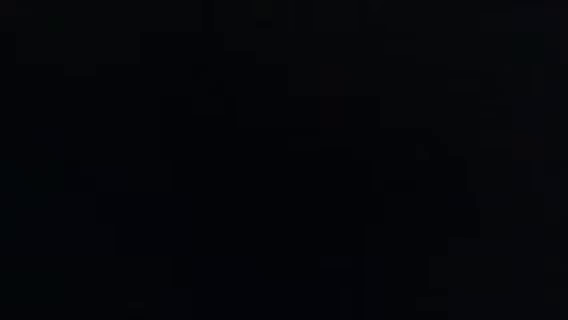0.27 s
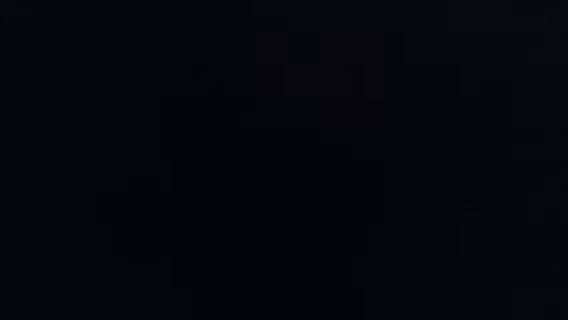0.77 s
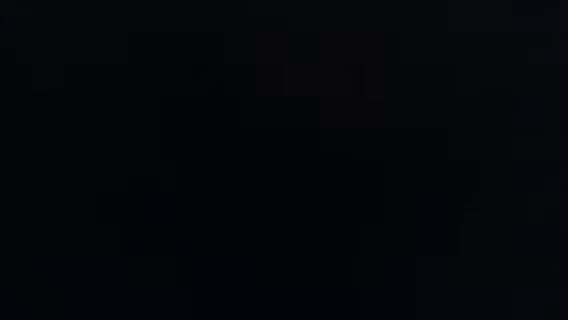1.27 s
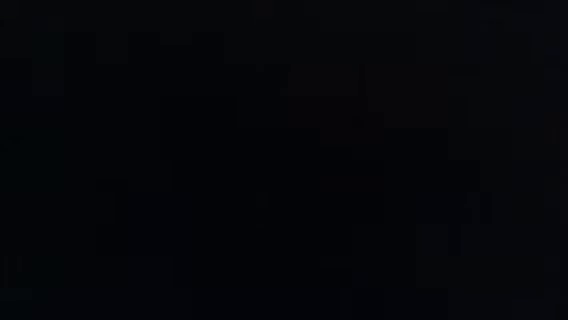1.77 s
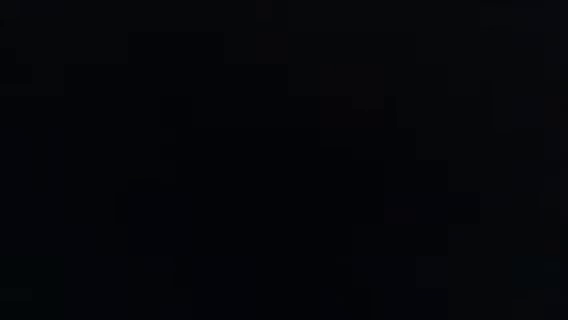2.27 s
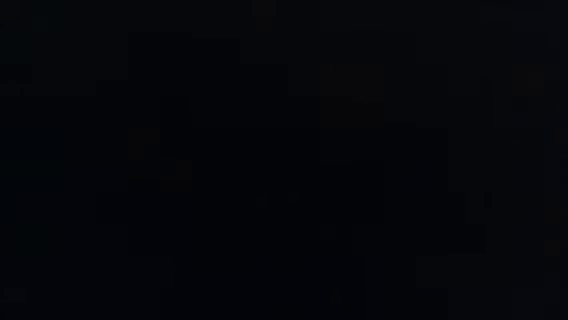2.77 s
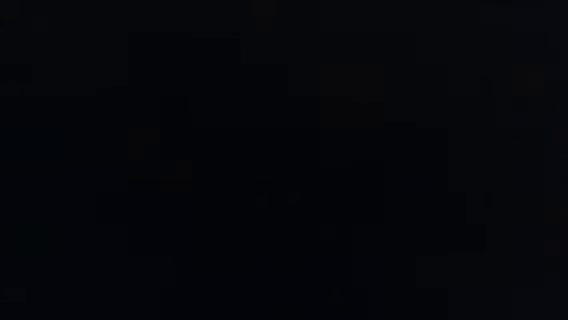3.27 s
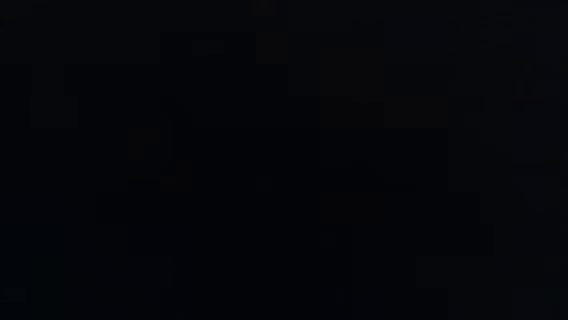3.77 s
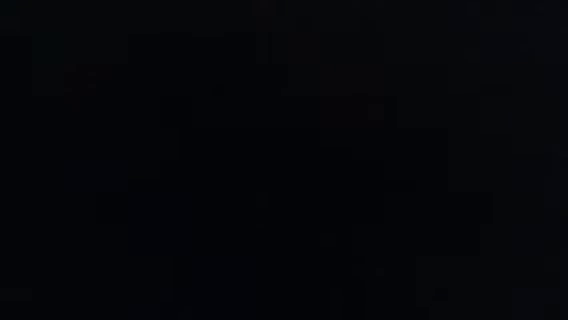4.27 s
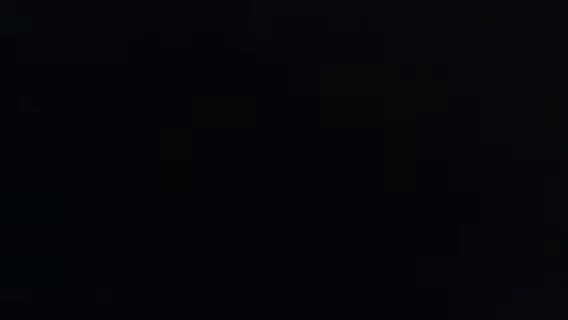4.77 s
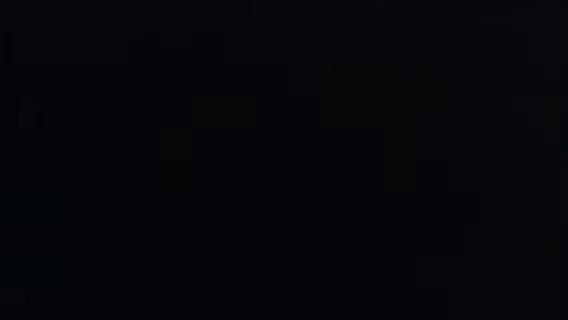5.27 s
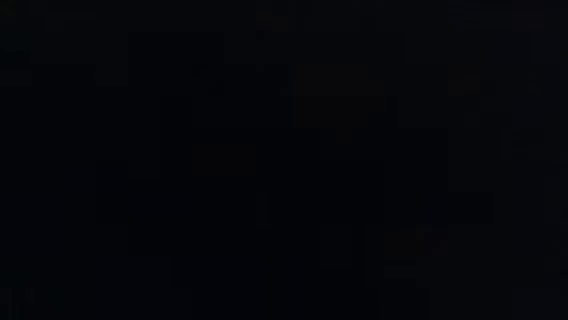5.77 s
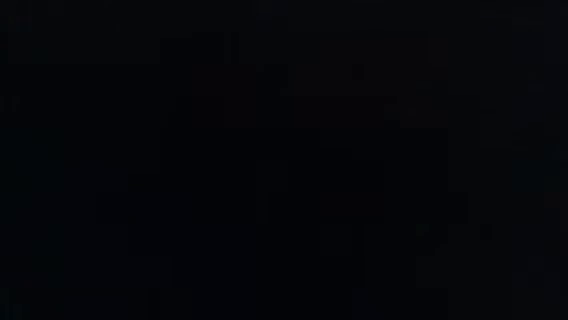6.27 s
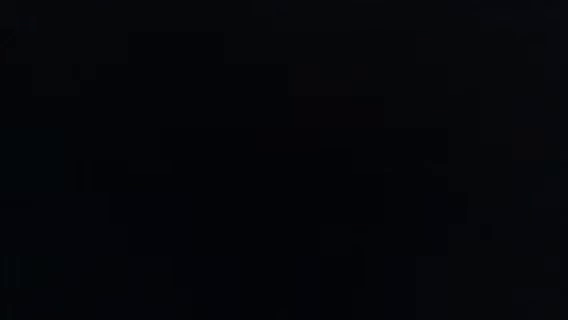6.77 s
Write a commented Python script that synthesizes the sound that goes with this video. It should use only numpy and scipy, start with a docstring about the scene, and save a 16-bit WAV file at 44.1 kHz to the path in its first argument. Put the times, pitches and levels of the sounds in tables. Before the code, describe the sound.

Rapid, piercing chirps from a small caged rodent, sounding much like a bird, run from start to finish. Each note holds high for an instant, then plunges and roughens. The pace is even until a small gap past five seconds, after which calls are slightly weaker and higher and a soft double knock comes from the cage. The room rings briefly around them; low hum and still air are barely audible. Mono pickup.

```python
"""A guinea pig chirps about six times a second in its cage, in a quiet room at night.
Each chirp is a short, high held whistle that swells, then plunges in pitch and turns rough: a sum of
overtones shaped by the throat, plus rasping noise. A near surface doubles it, the walls throw it back
and the room rings on. Filtered noise makes two soft bumps in the cage and the still air;
wavering sine tones make an appliance's hum and a low tone that fades out."""
import sys
import numpy as np
from scipy import signal
from scipy.fft import rfft, irfft, next_fast_len
from scipy.io import wavfile
from scipy.ndimage import map_coordinates

SR = 44100
rng = np.random.default_rng(int(sys.argv[2]) if len(sys.argv) > 2 else 0)


def store_pcm(level_fs):
    """Save levels as 16-bit WAV."""
    pcm = np.round(np.clip(level_fs, -1, 1) * 32767).astype(np.int16)
    wavfile.write(sys.argv[1], SR, np.atleast_2d(pcm).T)


N = 309141  # length in samples, about 7 s


def amp(db):
    """Turn decibels into a gain."""
    return 10 ** (np.asarray(db) / 20)


def unit(x):
    """Scale to an rms of 1."""
    return x / np.sqrt(np.mean(x ** 2) + 1e-20)


def along(points, hz):
    """Read a curve of (Hz, value) points on a logarithmic frequency axis."""
    f, v = np.transpose(points)
    return np.interp(np.log(hz + 1), np.log(f + 1), v)


def wobble(rate, size):
    """A smooth random curve through `rate` random points a second."""
    knots = rng.standard_normal(size // 8 + 4)
    return map_coordinates(knots, [np.arange(size) * rate / SR], mode="wrap")


def filtered(x, response):
    """Filter x by a response given as a function of frequency."""
    m = next_fast_len(len(x) + SR // 2)
    spectrum = rfft(x, m) * response(np.fft.rfftfreq(m, 1 / SR))
    return irfft(spectrum, m)[:len(x)]


def add(track, sound, s):
    """Mix a sound into the track from time s (seconds) on."""
    start = max(round(s * SR), 0)
    part = track[start:start + len(sound)]
    part += sound[:len(part)]


def chirp(held_hz, knee_db=-9, jitter=0.005, rough=0.085, rasp_db=-17, flutter_db=1.5, pure_db=-9,
          tense_db=2.0, steady_db=-6, doubling_swing_db=4.5, hoarse=.25):
    """One call, centred on its plunge: the held note sags, then falls and turns rough as the folds slacken."""
    # The plunge that ends every chirp. Each row: time from its middle in ms, pitch in Hz, effort in dB.
    plunge = [(-6.5, 3130, -4), (-4, 2860, 1.5), (-2, 2580, .5), (0, 2280, -2.5), (3, 1800, -5),
              (7, 1200, -9), (13, 735, -12), (18.5, 600, -38)]
    # The note's attack. Each row: time from the note's start in ms, effort in dB.
    attack = [(0, -42), (3, -13.5), (8, -11)]
    # The voice's overtones. Each row: multiple of the pitch, dB in the held note, dB in the plunge.
    voice = [(1, 0, 0), (2, -9, -14), (3, -13.5, -18), (4, -10.5, -27)]
    # Throat and mouth boost or damp each frequency. Each row: frequency in Hz, gain in dB.
    throat = [(700, -29.5), (1200, -20.5), (1550, -31.5), (2050, -11), (2480, 1.5), (2850, 1.5), (3600, -1),
              (4200, -6.5), (5400, -2), (7000, 7), (7550, 0.5), (8000, 2.5), (11000, -2.5), (14300, 1.5)]
    # The folds go slack. Two numbers: from and to, in ms from the middle of the plunge.
    slacken_ms = (-10, -4)
    # Period doubling comes and goes. Each row: time from the middle of the plunge in ms, share from 0 to 1.
    doubling_share = [(-24, 0), (-18.5, 0.92), (-16, 1), (4.5, 0.026)]
    # The in-between tones of period doubling. Each row: multiple of the pitch, level in dB.
    halves = [(1.5, -20.5), (2.5, -23)]
    # Colour of the air noise in the folds. Each row: frequency in Hz, gain in dB.
    rasp_colour = [(2000, -38), (3500, -4), (4800, -1.5), (6800, 1.5), (9000, 0.5), (14000, -7)]
    easy_hz, taut_hz = 3540, 125  # the pitch of relaxed folds, and the rise that makes them taut
    lead_ms, lead_scatter_ms = 29.5, 0.78  # relaxed folds start the held note this long before the middle
    sag_hz_per_ms = 17.5  # relaxed folds let the held note sink steadily
    taut_lead_ms, taut_sag_hz_per_ms = 3.7, -7  # taut folds hold the note longer and flatter
    held_scatter_db = 1.33  # the held note's strength varies from call to call

    size = SR // 10
    ms = (np.arange(size) - size / 2) * 1000 / SR

    # taut folds hold a higher note, brighter and less prone to period doubling
    tension = (held_hz - easy_hz) / taut_hz
    start = -lead_ms - taut_lead_ms * tension + lead_scatter_ms * rng.standard_normal()
    knee = slacken_ms[0]
    slack = np.interp(ms, slacken_ms, [0, 1])

    when, fall_hz, fall_db = np.transpose(plunge)
    sag = (sag_hz_per_ms + taut_sag_hz_per_ms * tension) * (knee - start) / 2
    pitch = np.interp(ms, [start, knee, *when], [held_hz + sag, held_hz - sag, *fall_hz])
    pitch = pitch * (1 + jitter * wobble(500.6, size))
    phase = 2 * np.pi * np.cumsum(pitch) / SR

    swell, swell_db = np.transpose(attack)
    effort_ms = [*(start + swell), knee, *when]
    effort_db = np.interp(ms, effort_ms, [*swell_db, knee_db, *fall_db], left=-120, right=-120)
    effort = amp(effort_db + held_scatter_db * rng.standard_normal() * (1 - slack))

    doubling_db = steady_db * tension + doubling_swing_db * wobble(188, size)
    doubling = np.interp(ms, *np.transpose(doubling_share)) * amp(doubling_db)

    # the note opens as a purer whistle; overtones grow once the folds close fully
    buzz_db = np.interp(ms - start, [2, 7], [pure_db, 0]) + tense_db * tension * (1 - slack)

    # the folds close unevenly, a little while they double and fully in the plunge:
    # the overtones smear while the fundamental stays clean
    uneven = np.clip(slack + hoarse * doubling, 0, 1)
    smear = 2 * np.pi * np.cumsum(pitch * rough * uneven * wobble(2500, size)) / SR

    def partial(k, db):
        """One multiple of the pitch, made louder or softer by the throat."""
        overtone_db = (k > 1) * (buzz_db + flutter_db * wobble(318.5, size))
        gain = amp(db + overtone_db + along(throat, k * pitch))
        return gain * np.sin(k * phase + (k - 1) * smear)

    call = sum(partial(k, held + slack * (falling - held)) for k, held, falling in voice)
    call += doubling * sum(partial(k, db) for k, db in halves)

    # air rasps through the slackening folds
    noise = rng.standard_normal(size)
    rasp = unit(filtered(noise, lambda hz: amp(along(throat, hz) + along(rasp_colour, hz))))
    rasp_fade = np.interp(ms, [5, 10], [1, 0])
    return effort * (call + amp(rasp_db) * uneven * rasp_fade * rasp)


def guinea_pig(early, voice_db=-1):
    """The run of chirps, weaker ones pinched higher, on a track with `early` seconds of lead-in."""
    # The chirps. Each row: middle of the plunge in seconds, level in dB before voice_db is added.
    chirps = [(-0.028, -36.5), (0.152, -37.5), (0.3239, -38.5), (0.484, -37), (0.6754, -35.5),
              (0.846, -36.5), (1.0393, -36.5), (1.2356, -37.5), (1.4014, -37), (1.5911, -36.5),
              (1.7612, -37.5), (1.9608, -38), (2.1425, -38), (2.308, -37.5), (2.4874, -38.5), (2.666, -38),
              (2.8363, -37), (3.0242, -38), (3.1898, -37.5), (3.389, -37.5), (3.5416, -37.5), (3.7202, -38),
              (3.9035, -37.5), (4.0816, -37.5), (4.2904, -37.5), (4.4406, -38), (4.6236, -36.5),
              (4.7826, -36), (4.9521, -37), (5.1334, -36.5), (5.3011, -37.5), (5.5846, -39.5),
              (5.7557, -38), (5.9563, -39), (6.206, -39.5), (6.3616, -38.5), (6.5147, -38.5), (6.6789, -39),
              (6.8461, -38.5), (7.0095, -39)]
    # The voice creeps up over the run. Each row: time in seconds, mid pitch of an ordinary held note in Hz.
    pitch_drift = [(0, 3537), (1.3, 3500), (2.6, 3564), (3.3, 3516), (4.4, 3575), (5.3, 3577), (6, 3627),
                   (7, 3634)]
    usual_db = -37.5  # an ordinary chirp, on the same scale as the table
    pinch_hz_per_db = 15  # a weaker chirp is pinched a little higher
    track = np.zeros(N + round(early * SR))
    for s, db in chirps:
        held_hz = np.interp(s, *np.transpose(pitch_drift)) + pinch_hz_per_db * (usual_db - db)
        call = chirp(held_hz)
        add(track, amp(db + voice_db) * call, s + early - len(call) / SR / 2)
    return track


def cage(early, rise=0.0025, t60=0.04):
    """Soft knocks: noise through the tray's resonances, with a quick rise (s) and a 60 dB fall in t60 (s)."""
    # The knocks. Each row: start in seconds, level in dB before the rise and fall.
    bumps = [(5.798, -53.5), (5.862, -65)]
    # The tray's resonances. Each row: centre in Hz, width in Hz, level in dB.
    resonances = [(640, 290, -7.5), (966, 380, -6), (1400, 530, -11), (1730, 270, -17)]
    track = np.zeros(N + round(early * SR))
    t = np.arange(SR // 5) / SR

    def tray(f):
        """The tray's resonances summed, every other one upside down."""
        total = 0
        for k, (centre, width, db) in enumerate(resonances):
            damping = 1j * f * width
            total = total + (-1) ** k * amp(db) * damping / (centre * centre - f * f + damping)
        return total

    for s, db in bumps:
        scuff = unit(filtered(rng.standard_normal(len(t)), tray))
        envelope = amp(db - 60 * t / t60) * (1 - np.exp(-t / rise))
        add(track, envelope * scuff, s + early)
    return track


def room(x, tail_db, near_hz=7000, walls_hz=4300):
    """Direct sound, distinct echoes and a diffuse noise tail whose treble dies first."""
    # The surface beside the animal. Two numbers: delay in ms, level in dB.
    near = (2.831, 0.16)
    # The walls. Each row: delay in ms, level in dB.
    walls = [(5.968, -6.5), (18.623, -10), (19.467, -6.5), (20.988, -9.5), (34.302, -13), (38.999, -40)]
    # How long the tail rings. Each row: frequency in Hz, time to fall by 60 dB in seconds.
    ringing = [(500, 0.51), (2800, 0.51), (7000, 0.36), (14000, 0.29)]
    # The tail's colour. Each row: frequency in Hz, gain in dB before tail_db is added.
    colour = [(500, -5), (950, -1), (1250, 6.5), (1600, -4), (2600, -4), (3500, -0.5), (4200, -5),
              (6500, 4), (10000, 2), (14000, 5.5)]
    # The tail thickens sooner in the treble, which scatters off the cage.
    # Each row: frequency in Hz, build-up time in seconds.
    thickening = [(3500, .013), (6500, .003)]

    hz, t, z = signal.stft(rng.standard_normal(SR * 2 // 3), SR, nperseg=256)
    build = 1 - np.exp(-t / along(thickening, hz)[:, None])
    decay = amp(-60 * t / along(ringing, hz)[:, None])
    tail = signal.istft(z * decay * build, SR, nperseg=256)[1]
    tail = filtered(tail / np.linalg.norm(tail), lambda f: amp(along(colour, f)))

    def echo(f, ms, db, edge):
        """One delayed copy; bedding and furniture scatter its treble above the edge (Hz)."""
        return amp(db) * np.exp(-2j * np.pi * f * ms / 1000) / (1 + (f / edge) ** 6)

    def paths(f):
        """The direct sound, the near surface and the walls together."""
        return 1 + echo(f, *near, near_hz) + sum(echo(f, ms, db, walls_hz) for ms, db in walls)

    return filtered(x, paths) + amp(tail_db) * signal.fftconvolve(x, tail)[:len(x)]


def tone(hz, waver_db=2, drift=0.46):
    """A sine near rms 1 whose level (dB) and phase (radians) wander slowly."""
    phase = 2 * np.pi * np.cumsum(np.broadcast_to(hz, N)) / SR
    phase = phase + drift * wobble(2.94, N) + rng.uniform(0, 2 * np.pi)
    return np.sqrt(2) * amp(waver_db * wobble(4, N)) * np.sin(phase)


def appliance(hum_db=-1):
    """An appliance's slightly unsteady hum: a stack of low wavering tones."""
    # The hum's tones. Each row: frequency in Hz, rms level in dB before hum_db and the wavering.
    hum = [(55.8, -82.5), (113.1, -70.5), (153.3, -77.5), (169.8, -75.5), (192, -79.5), (226.2, -76.5),
           (283, -87), (384, -91.5), (576, -90.5)]
    return sum(amp(db + hum_db) * tone(hz) for hz, db in hum)


def low_tone():
    """A faint low tone that sinks a little and dies away."""
    # Each row: time in seconds, rms level in dB before the wavering, pitch in Hz before the phase drift.
    drone = [(0, -69, 259), (.11, -75, 256), (.19, -68.5, 246), (.26, -87, 243), (.5, -115, 243)]
    t = np.arange(N) / SR
    when, drone_db, drone_hz = np.transpose(drone)
    return amp(np.interp(t, when, drone_db)) * tone(np.interp(t, when, drone_hz))


def still_air(air_db=-68):
    """The still air of the room: steady noise, strongest in the bass, at an rms of air_db."""
    # The air's colour. Each row: frequency in Hz, relative level per Hz in dB.
    air = [(20, -17), (36, -16.5), (52, 4.5), (80, -5.5), (140, 2.5), (220, -3), (320, -9.5), (600, -14.5),
           (1000, -22.5), (2000, -23), (4200, -29), (6000, -21), (15000, -30.5)]
    return amp(air_db) * unit(filtered(rng.standard_normal(N), lambda hz: amp(along(air, hz))))


def scene():
    """Animal and cage in the room, over the night's background."""
    early = .2  # seconds of lead-in, cut off at the end so that the room already rings
    heard = room(guinea_pig(early), tail_db=-2.5) + room(cage(early), tail_db=-10)
    background = still_air() + appliance() + low_tone()
    return (heard[-N:] + background)[None]


def record(dry):
    """Keep nothing above the band limit."""
    top_hz = 15600
    return filtered(dry[0], lambda hz: hz < top_hz)[None]


dry = scene()
out = record(dry)
store_pcm(out)
```